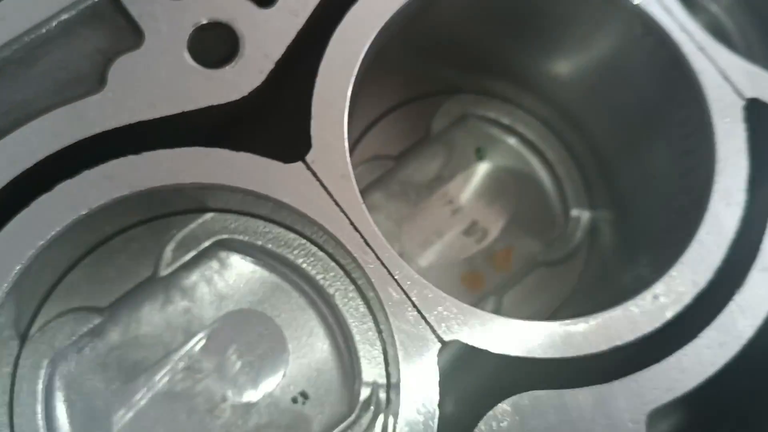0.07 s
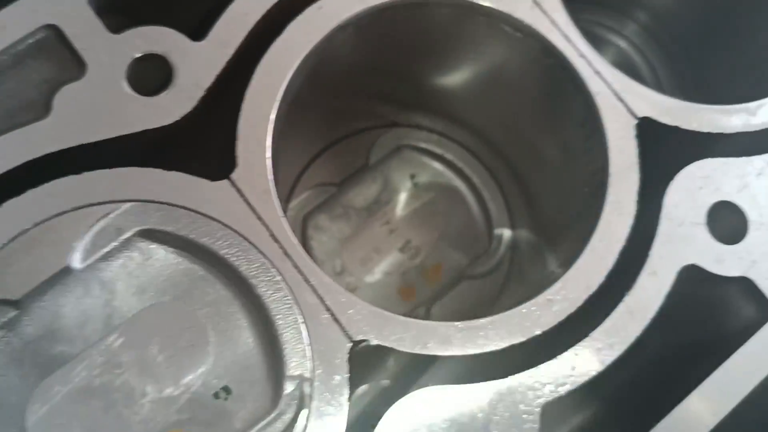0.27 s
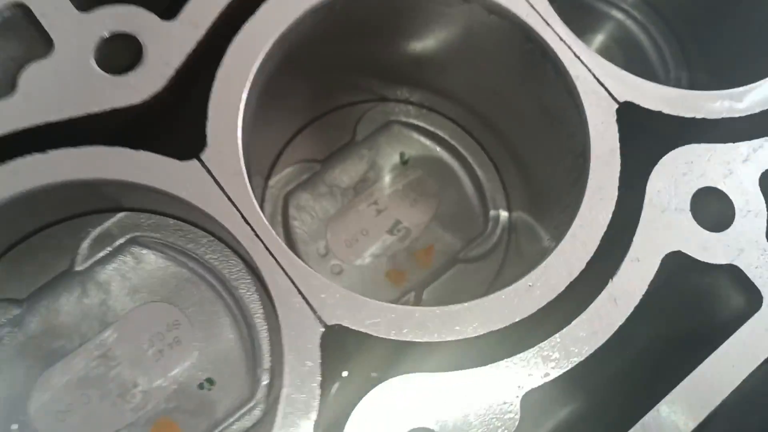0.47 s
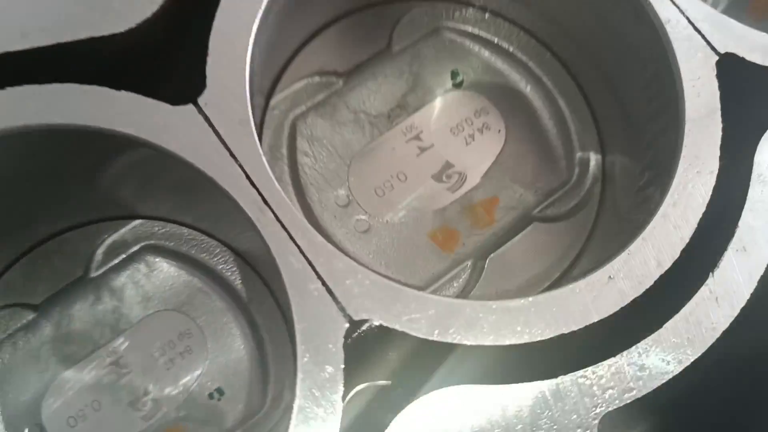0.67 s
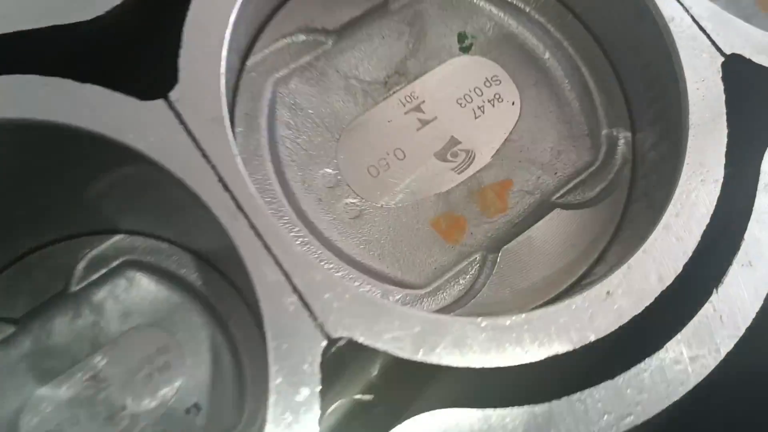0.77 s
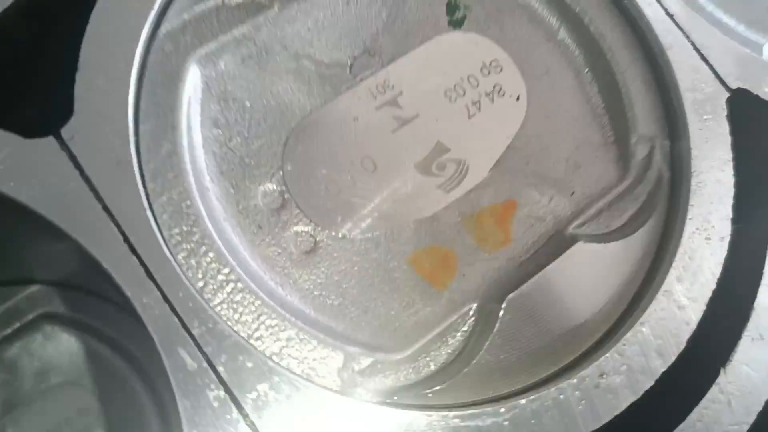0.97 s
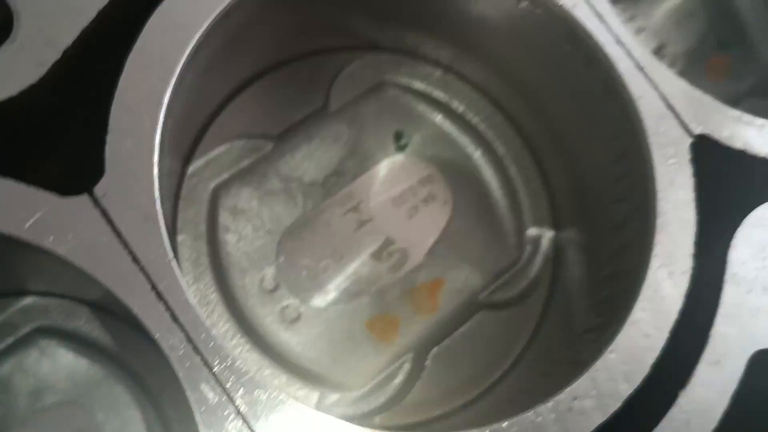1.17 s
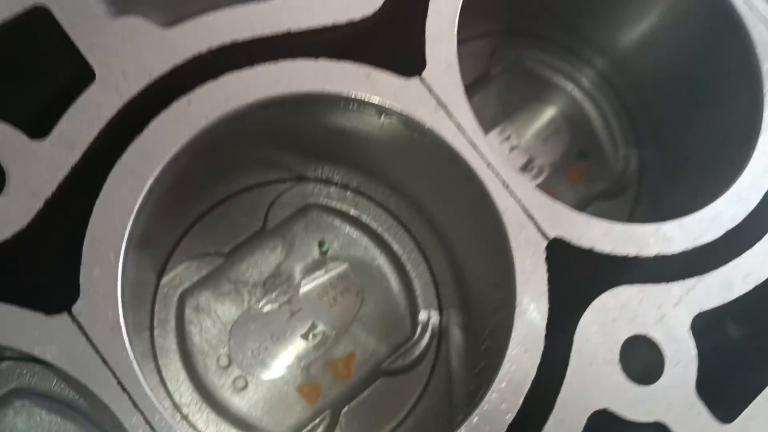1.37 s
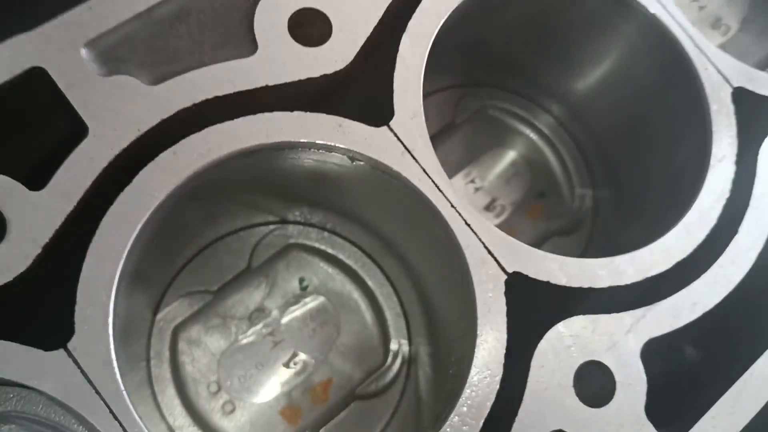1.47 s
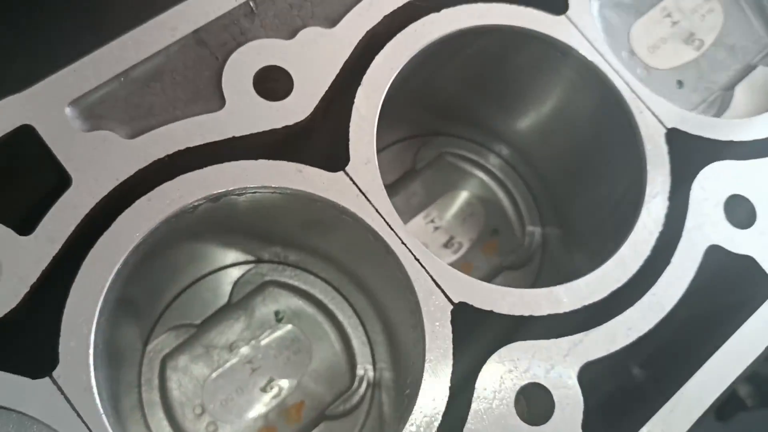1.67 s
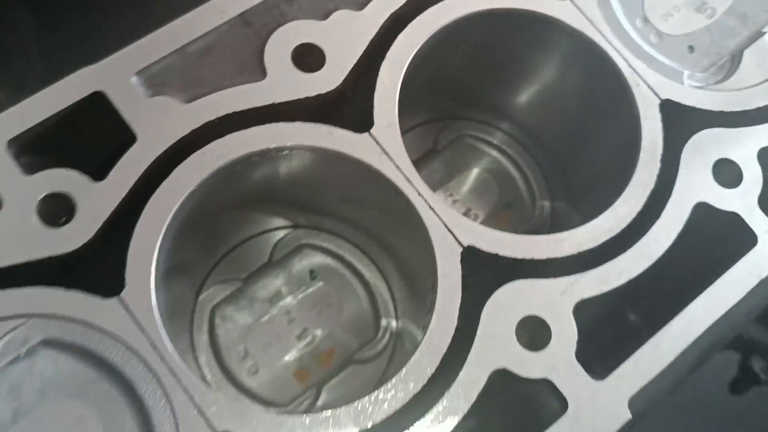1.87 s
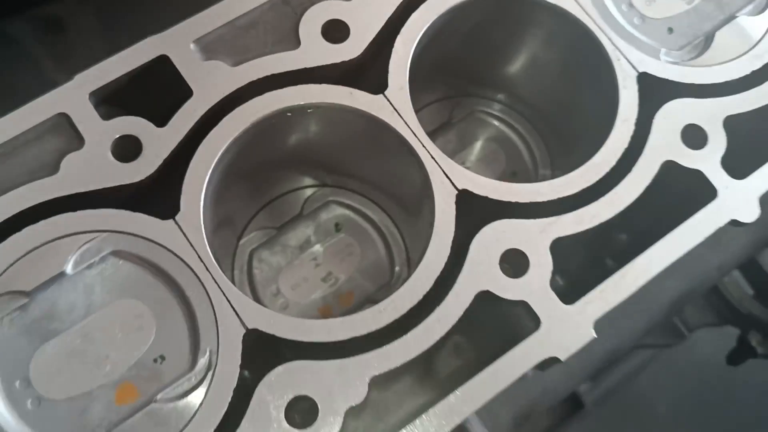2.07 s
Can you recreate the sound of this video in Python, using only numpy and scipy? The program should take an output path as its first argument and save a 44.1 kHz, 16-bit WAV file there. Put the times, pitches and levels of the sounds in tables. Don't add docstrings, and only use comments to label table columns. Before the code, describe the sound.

Gritty metallic scraping of piston rings in engine bores, in five stiff pushes, with soft thuds

```python
import sys
import numpy as np
from scipy import signal
from scipy.fft import rfft, irfft, next_fast_len
from scipy.io import wavfile
from scipy.ndimage import uniform_filter1d, minimum_filter1d, map_coordinates

SR = 44100
rng = np.random.default_rng(int(sys.argv[2]) if len(sys.argv) > 2 else 0)


def dump(signal):
    limited = np.clip(np.atleast_2d(signal).T, -1, 1)
    pcm = np.round(limited * 32767).astype(np.int16)
    wavfile.write(sys.argv[1], SR, pcm)


def field_ratio(decibels):
    return 10 ** (np.asarray(decibels, dtype=float) / 20)


N = 93624
TIME_S = np.arange(N) / SR

# [f/Hz, density/dB]
SHOP = [(30, -36), (50, -27), (70, -2), (300, -7), (600, -14.5), (1200, -16.5), (2800, -16), (5500, -30.5),
        (15800, -53.5)]
# [f/Hz, correlation/1]
SHOP_ALIKE = [(60, 0.97), (330, .82), (800, 0.52), (2000, 0.049)]
# [f/Hz, width/Hz, level/dB]
HUM = [
    (75.5, 16, -49),
    (365, 14, -55),
]
SHOP_DB = -39.5

# [t/s, scrape level/dB, jacket ring level/dB, liner ring level/dB]
PUSHES = [
    [(0.0, -18, -12.5, -13.5), (0.03, -19, -13, -6.5), (0.082, -21, -19, -8.5), (0.11, -17.5, -12, -9.5),
     (0.344, -23.5, -27, -19.5), (0.385, -38.5, -1, -9)],
    [(0.385, -42.5, -5, -16), (0.414, -22, -23, -11), (0.428, -16, -40, -16), (0.457, -17, -45, -5),
     (0.493, -21, -23, -11.5), (0.52, -25.5, -25, -13), (0.55, -24, -14, -14)],
]
LATER_PUSHES = [
    [(0.55, -26.5, -28, -12), (0.58, -22.5, -23, -11), (0.6, -17, -26, -13), (0.695, -18, -20.5, -12.5),
     (0.716, -23.5, -11.5, -9.5), (0.8, -20.5, -15, -8), (0.864, -18.5, -19, -8.5),
     (0.884, -17, -37, -14.5), (0.965, -19.5, -43, -20.5), (1.014, -23.5, -37, -18), (1.035, -36, 1, -16)],
    [(1.035, -40, -17, -18), (1.055, -21, -40, -23), (1.074, -14.5, -49, -22), (1.101, -17.5, -31, -6),
     (1.195, -22, -19.5, -16), (1.225, -21, -33, -7.5), (1.263, -23.5, -12, -6.5), (1.331, -22, -14.5, -12),
     (1.358, -24.5, -15, -15), (1.375, -31, -15, -14), (1.41, -30.5, -9, -21)],
    [(1.41, -34, -13, -15), (1.44, -27, -25, -20.5), (1.5, -22, -16, -13.5), (1.58, -23.5, -12, -7.5),
     (1.63, -25, -12.5, -14), (1.712, -29.5, -18, -11), (1.788, -26, -21, -18), (1.838, -29, -11.5, -24),
     (1.882, -35, -22, -19), (1.97, -42, -8, -15)],
]
JACKET_DB, LINER_DB = 22, 13.5
STOP_S, SLOWING_S = 1.955, 0.081
SLOWING_DULLS = 2.2
CHATTER_DB = -0.6548
# [t/s, level/dB]
BITE = [(0, 0), (.14, -1.5), (.3, 0), (.4, 0.5), (.47, -4.5), (.6, -2.5), (.72, 4.5), (.82, -2.5), (.92, 2),
        (1.02, 3), (1.12, 2.5), (1.2, -2), (1.32, 1), (1.4, 4.5), (1.52, -2), (1.65, -1.5), (1.8, 4),
        (1.9, 11)]
# [t/s, level/dB]
DRIFT = [(0, -2), (.2, -1), (.4, -4), (.6, -1.5), (.8, 0), (1.0, -1), (1.25, 1), (1.45, -1), (1.7, -2),
         (1.9, -5.5)]

GRIT_PER_S, GRIT_SPREAD_DB, GRIT_SHARE, SHARED = 5000, 4, 0.16, 0.2
RIGHT_LAG = 18
PATCHY_DB, STREAK_DB = 1.4, 2.0

# [f/Hz, level/dB]
BODY_LEFT = [(300, -45), (800, -7.5), (1200, -17), (1650, -7.5), (3300, -1.5), (4400, -8), (5200, -24.5),
             (9000, -33)]
BODY_RIGHT = [(300, -60), (700, -15.5), (1500, -4), (2450, -1), (3600, 10), (4600, -4), (6200, -11),
              (9000, -42)]
# [f/Hz, width/Hz, left level/dB, right level/dB]
BLOCK = [(2000, 15.5, -25, 7), (2203, 114, -3, 7), (2752, 163, -13, 12), (3123, 106, -30, 15.5),
         (3990, 50, -6, -12)]
DULL_FROM_HZ, DULL_PER_DB = 3240, 0.32
# [t/s, f/Hz, lift/dB]
BORE = [(0, 3040, 4.5), (.15, 2750, 3.5), (.33, 3050, 2), (.45, 3000, 2), (.56, 3170, 0.5), (.68, 3000, 6),
        (.8, 3200, 1), (.92, 3500, 2.5), (1.02, 3160, 4), (1.09, 2750, 5.5), (1.2, 3000, 4),
        (1.32, 3080, 4), (1.5, 2780, 3.5), (1.599, 3040, 1.5), (1.8, 2670, 3), (1.95, 2720, 1)]
BORE_WIDTH_HZ, BORE_LOSS_DB = 400, -1.5
# [f/Hz, width/Hz, left level/dB, right level/dB]
DECK = [(3310, 98, -0.5, 0.5), (2496, 240, -8.5, 0.65)]
DECK_PER_RING_DB = -1
# [f/Hz, width/Hz, left level/dB, right level/dB]
JACKET = [(945, 71.5, 1, -10.5), (981.7, 71, -1.2, -24)]
# [t/s, f/Hz, level/dB]
COLUMN_A = [(0, 1440, 9.5), (.12, 1500, 16.5), (.26, 1700, -19), (.45, 2230, 11.5), (.6, 1530, 5.5),
            (.76, 1380, 5), (.84, 1280, 14.5), (.92, 1110, 2.5), (1.0, 780, 9.5), (1.06, 780, 3.5),
            (1.14, 850, -3), (1.3, 1280, 5.5), (1.46, 1510, 16), (1.56, 1524, 19.5), (1.66, 1600, 8.5),
            (1.95, 1860, 11)]
COLUMN_B = [(0, 1130, -5), (0.199, 965, 8.5), (.38, 810, -18), (.55, 1000, -21), (.75, 1340, 10),
            (.86, 1630, 10), (1.0, 2110, 7), (1.1, 2000, 2), (1.17, 1600, 13), (1.29, 1360, 9.5),
            (1.45, 1030, -26), (1.7, 824, 5), (1.95, 780, -3)]
COLUMN_Q = 5.03
# [left level/dB, right level/dB]
COLUMN_PORTS_DB = [(-16, -7.5), (-8.5, -9)]
LINER_HZ = [4170, 4400, 4950, 5600, 6960, 7390, 10700]
# [width/Hz, left level/dB, right level/dB]
LINER = [(58.5, -7.5, 5.5), (119, -9.5, -15), (60, -22, -5.5), (91, -24, -12), (160, -35, -15.5),
         (58, -24, -31.5), (300, -30, -33)]
# [t/s, f/Hz]
LINER_PITCH = [(0, 4170), (.17, 4170), (.35, 4090), (.5, 4155), (.66, 4190), (.8, 4200), (.97, 4030),
               (1.1, 4180), (1.25, 4160), (1.4, 4200), (1.52, 4040), (1.7, 4150), (1.95, 4100)]
# [f/Hz, level/dB]
FIZZ_LEFT = [(5000, -34), (6200, -23), (6900, -25), (7800, -34.5), (9500, -34), (12000, -25), (15800, -29)]
FIZZ_RIGHT = [(5000, -80), (6300, -15), (7500, -14.5), (8400, -28), (10500, -36), (11500, -40.5),
              (15800, -30)]
BRIGHT_PER_DB = 0.53

ROOM_T60_S, ROOM_DB = 0.29, -13.5

# [t/s, level/dB]
THUDS = [(0.114, -35.5), (.255, -39.5), (0.371, -32), (0.4, -49), (1.03, -38), (1.258, -38), (1.922, -33.5),
         (2.013, -45)]
# [f/Hz, level/dB, t60/s]
STAND = [(232, 8, 0.078), (309.4, 12.5, 0.07), (374.5, 6.5, 0.067)]
THUD_RISE_S, THUD_SCATTER_DB = 0.0076, 1.5
# [t/s, level/dB]
GROAN = [(1.74, -53), (1.84, -40), (1.93, -42), (2.03, -36), (2.075, -50), (2.12, -40)]
# [f/Hz, width/Hz, left level/dB, right level/dB]
GROAN_MODES = [(165, 46, -3.5, -5), (246, 18, -3, -3), (287, 21, 1, -0.5), (366.4, 11, 7, 6.5),
               (501, 54, -5, -14.5)]


def unit(x):
    return x / np.sqrt(np.mean(x ** 2) + 1e-20)


def along(points, hz):
    f, v = np.transpose(points)
    return np.interp(np.log(hz + 1), np.log(f + 1), v)


def track(points, t=TIME_S):
    s, *curves = np.transpose(points)
    return [np.interp(t, s, curve) for curve in curves]


def wobble(rate_hz):
    knots = rng.standard_normal(int(N * rate_hz / SR) + 4)
    return map_coordinates(knots, [np.arange(N) * rate_hz / SR])


def filtered(x, response):
    m = next_fast_len(N + SR // 2)
    return irfft(rfft(x, m) * response(np.fft.rfftfreq(m, 1 / SR)), m)[..., :N]


def moving(x, response):
    f, t, z = signal.stft(x, SR, nperseg=1024)
    return signal.istft(z * np.abs(response(f[:, None], t)), SR, nperseg=1024)[1][..., :N]


def peak(f, hz, width_hz):
    return 1j * f * width_hz / (hz * hz - f * f + 1j * f * width_hz)


def modes(table, shift=1):
    def response(f):
        total = 0
        for k, (hz, width_hz, left_db, right_db) in enumerate(table):
            steep = peak(f, hz * shift, 2 * width_hz) ** 2
            total = total + (-1) ** k * np.multiply.outer(field_ratio([left_db, right_db]), steep)
        return total
    return response


def ports(left, right):
    return lambda f: field_ratio([along(left, f), along(right, f)])


def patchy(x, depth_db, streak_db=0):
    z = signal.stft(x, nperseg=512)[2]

    def field(bins, frames):
        noise = rng.standard_normal(z.shape[-2:])
        return unit(uniform_filter1d(uniform_filter1d(noise, bins, axis=0), frames, axis=1))

    gain = field_ratio(depth_db * field(7, 10) + streak_db * field(1, 22))
    gain = gain / np.sqrt(np.mean(gain ** 2))
    return signal.istft(z * gain, nperseg=512)[1][..., :N]


def shop():
    def mid_side(f):
        turn = np.arccos(np.clip(along(SHOP_ALIKE, f), -1, 1)) / 2
        return field_ratio(along(SHOP, f)) * [np.cos(turn), np.sin(turn)]

    mid, side = filtered(patchy(rng.standard_normal((2, N)), depth_db=1.0), mid_side)
    floor = field_ratio(SHOP_DB) * unit(np.array([0.86 * (mid + side), mid - side]))
    hum = np.zeros(N)
    for hz, width_hz, db in HUM:
        tone = filtered(rng.standard_normal(N), lambda f: peak(f, hz, width_hz) ** 2)
        hum += field_ratio(db) * unit(tone)
    return floor + hum * field_ratio([[-0.6], [0.6]])


def grit(shared, lag=RIGHT_LAG):
    hit = rng.random((3, N)) < GRIT_PER_S / SR
    size = field_ratio(GRIT_SPREAD_DB * rng.standard_normal((3, N)))
    snaps = hit * size * np.sign(rng.standard_normal((3, N)))
    hiss = rng.standard_normal((3, N))
    x = np.sqrt(GRIT_SHARE) * unit(snaps) + np.sqrt(1 - GRIT_SHARE) * hiss
    common = np.array([x[2], np.roll(x[2], lag)])
    mix = np.sqrt(shared) * common + np.sqrt(1 - shared) * x[:2]
    return patchy(mix, PATCHY_DB, STREAK_DB)


def slowing(k):
    return np.clip((STOP_S - TIME_S) / (k * SLOWING_S), 0, 1) ** k


def bore_db(f, t):
    hz, lift_db = track(BORE, t)
    return BORE_LOSS_DB + lift_db * np.abs(peak(f, hz, BORE_WIDTH_HZ)) ** 2


def block(slide, pushes):
    smooth = ports(BODY_LEFT, BODY_RIGHT)
    body = filtered(slide * grit(SHARED), lambda f: smooth(f) + modes(BLOCK)(f))

    def bore_and_dulling(f, t):
        speed_db = track(pushes, t)[0] + 20
        upper = np.clip(3 * np.log2((f + 1) / DULL_FROM_HZ), 0, 1)
        return field_ratio(bore_db(f, t) + DULL_PER_DB * speed_db * upper)

    return moving(body, bore_and_dulling)


def deck(slide, ring_db):
    return filtered(slide * grit(SHARED) * field_ratio(DECK_PER_RING_DB * ring_db), modes(DECK))


def jacket(slide, jacket_db):
    return filtered(slide * grit(1.0, lag=0) * field_ratio(jacket_db), modes(JACKET))


def columns(f, t):
    out = 0
    for column, ports_db in zip((COLUMN_A, COLUMN_B), COLUMN_PORTS_DB):
        hz, db = track(column, t)
        resonance = field_ratio(db) * np.abs(peak(f, hz, hz / COLUMN_Q)) ** 2
        out = out + np.multiply.outer(field_ratio(ports_db), resonance)
    return out


def air(slide):
    return moving(slide * grit(0.25), columns)


def liner(slide, ring_db):
    table = [(hz, *rest) for hz, rest in zip(LINER_HZ, LINER)]
    drive = slide * grit(0.13) * field_ratio(ring_db + 3.5) * slowing(SLOWING_DULLS)
    return moving(drive, lambda f, t: modes(table, track(LINER_PITCH, t)[0] / LINER_HZ[0])(f))


def fizz(slide, level_db, ring_db):
    bright_db = BRIGHT_PER_DB * (level_db + 28) + 0.45 * ring_db + track(BITE)[0]
    return filtered(slide * grit(0.039) * field_ratio(bright_db), ports(FIZZ_LEFT, FIZZ_RIGHT))


def scrape():
    pushes = np.concatenate(PUSHES + LATER_PUSHES)
    level_db, jacket_db, ring_db = track(pushes)
    jacket_db, ring_db = jacket_db + JACKET_DB, ring_db + LINER_DB
    level_db = level_db + CHATTER_DB * (0.13 * wobble(33.6) + 1.12 * wobble(90))
    slide = field_ratio(level_db) * slowing(1)
    metal = block(slide, pushes) + deck(slide, ring_db) + liner(slide, ring_db)
    cavities = jacket(slide, jacket_db) + air(slide)
    port_gain = field_ratio([7.5 + track(DRIFT)[0], np.full(N, 7.0)])
    return port_gain * (metal + cavities) + field_ratio(7) * fizz(slide, level_db, ring_db)


def room(x):
    t = np.arange(SR // 3) / SR
    tail = rng.standard_normal((2, len(t))) * field_ratio(-60 * t / ROOM_T60_S) * (t > 0.008)
    return signal.fftconvolve(x, tail / np.linalg.norm(tail[0]), axes=1)[:, :N]


def thuds():
    out, t = np.zeros(N + SR), np.arange(SR // 3) / SR
    for s, db in THUDS:
        ring = np.zeros(len(t))
        for hz, mode_db, t60_s in STAND:
            decay = field_ratio(mode_db + rng.normal(0, THUD_SCATTER_DB) - 60 * t / t60_s)
            ring += decay * np.sin(2 * np.pi * hz * rng.normal(1, 0.0088) * t)
        out[round(s * SR):][:len(t)] += field_ratio(db) * ring * (1 - np.exp(-t / THUD_RISE_S))
    return out[:N]


def groan():
    s, db = np.transpose(GROAN)
    tone = unit(filtered(rng.standard_normal(N), modes(GROAN_MODES)))
    return tone * field_ratio(np.interp(TIME_S, s, db, left=-120) + wobble(39.78))


def scene():
    rings = scrape()
    return shop() + rings + field_ratio(ROOM_DB) * room(rings) + thuds() + groan()


def top_cut(x):
    return signal.sosfilt(signal.butter(12, 15850, fs=SR, output="sos"), x)


def record(dry):
    need = np.minimum(1, 0.99 / np.abs(dry).max(0).clip(1e-6))
    gain = uniform_filter1d(minimum_filter1d(need, size=257), size=129)
    return top_cut(dry * gain)


dry = scene()
out = record(dry)
dump(out)
```